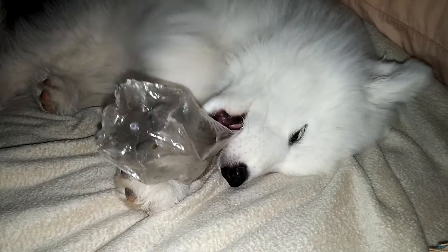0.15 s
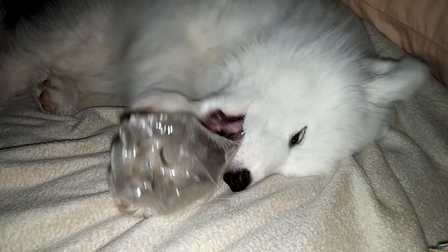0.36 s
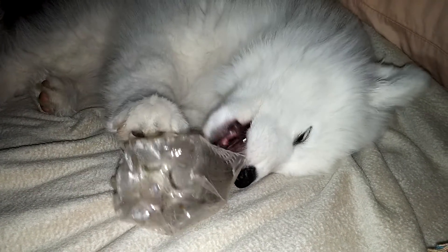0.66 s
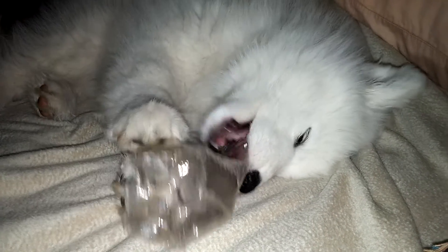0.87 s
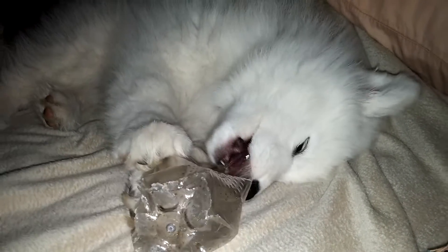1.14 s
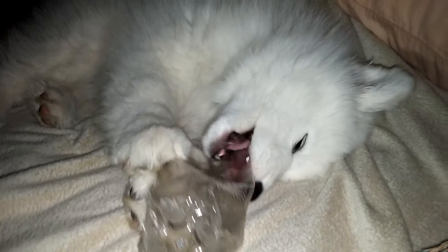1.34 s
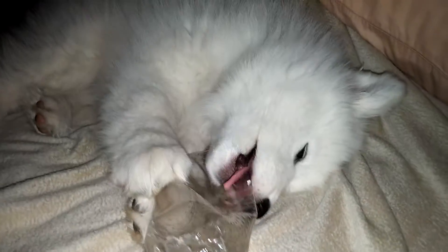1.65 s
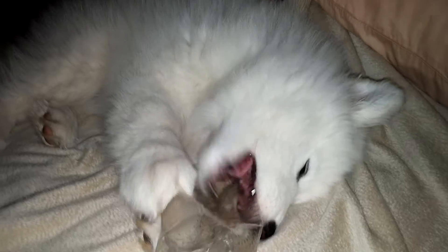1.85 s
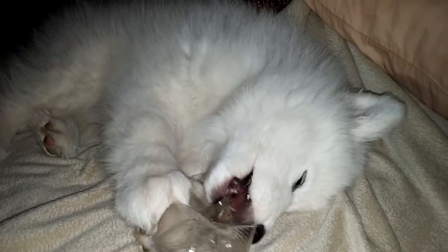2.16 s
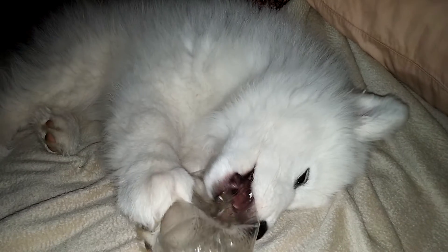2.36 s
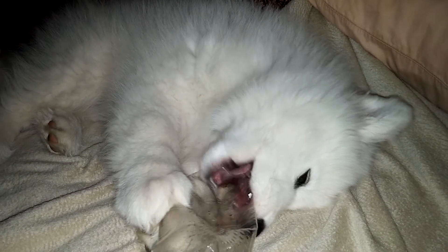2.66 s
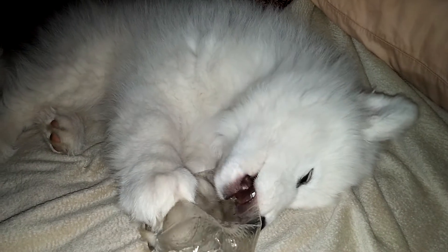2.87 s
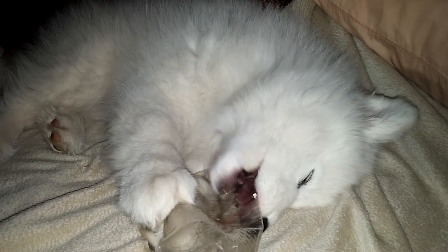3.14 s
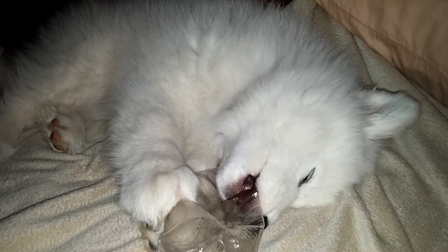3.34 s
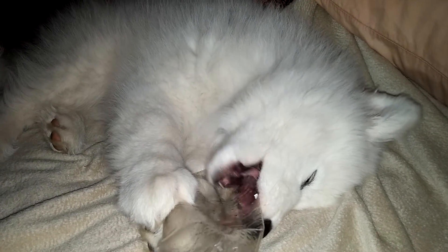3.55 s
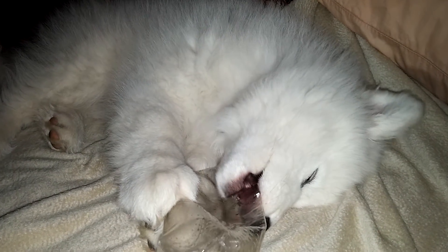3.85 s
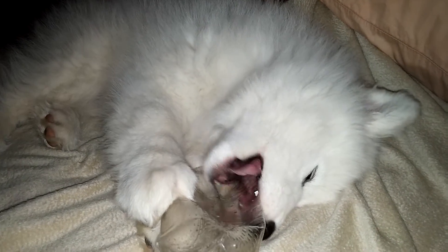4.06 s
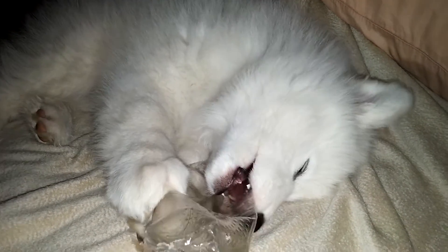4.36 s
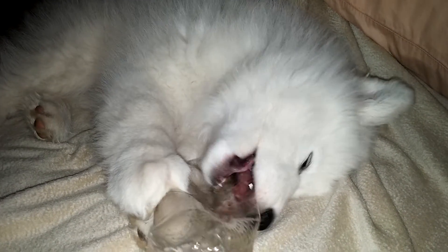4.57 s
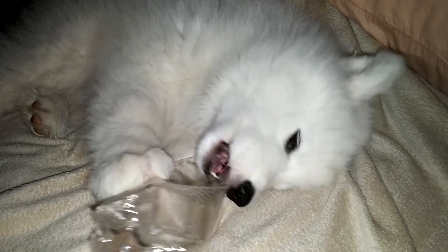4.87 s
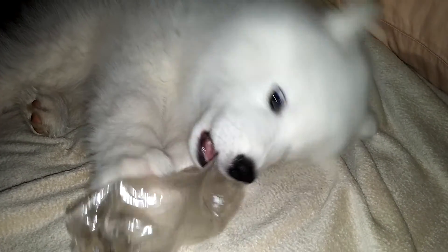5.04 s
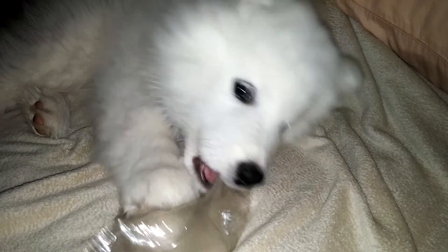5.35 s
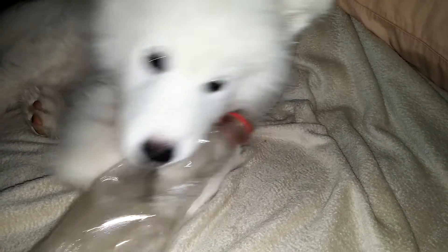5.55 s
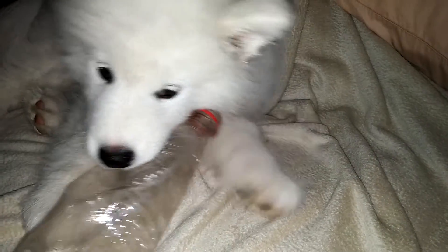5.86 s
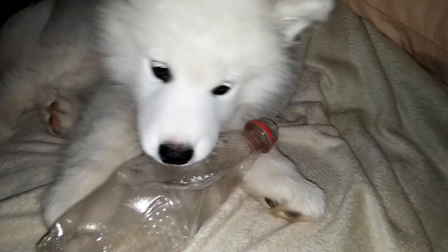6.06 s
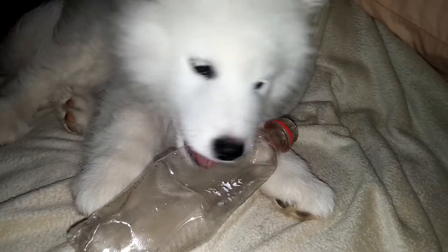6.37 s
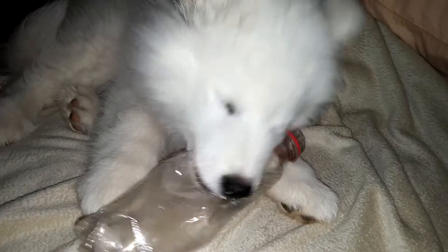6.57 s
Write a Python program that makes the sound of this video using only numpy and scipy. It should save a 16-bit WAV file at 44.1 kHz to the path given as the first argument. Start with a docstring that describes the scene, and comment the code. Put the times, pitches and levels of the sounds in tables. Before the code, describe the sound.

A close, dry stereo phone pickup in a quiet room with soft bedding. A puppy gnaws a thin empty plastic bottle. The first 0.45 seconds hold only a brief scrape, a tooth click and faint hush. From 0.5 to 0.8 crinkles and two clear hollow pocks arrive, then more clusters around 1.1-1.25 and 1.4-1.75. Each crease is a bright tick, short plastic rattle, hollow mid-pitched pop and soft low thump. At 2.2 and, loudest, 2.38 stiff panels snap with hard bright cracks and a brief rough ring. Sparser crackles follow from 2.6 to 3.9. Chewing thickens at 4.2-4.8, with a strong hollow pop at 4.45, and at 4.9-5.35, with a crunchy pop at 5.14. Busy crackling and fur rubbing fill 5.5-5.8; a lull, a pop at 6.15 and light final scraping near 6.4 end it.

```python
"""A thin empty plastic bottle crackles as a puppy gnaws it on a blanket, close to a phone in a quiet room.
Each crease that flips sums a tick, a wall rattle, a hollow panel pock and a soft thump, from noise and modes.
Twice a stiff panel snaps through: a hard crack, then dense clusters of partials ringing on.
Bouts of chewing scrape (random slips), set off small creases and brush fur on the plastic.
Bumps, tooth clicks, short reflections and a faint room hush complete the scene."""
import sys
import numpy as np
from scipy import signal
from scipy.fft import rfft, irfft, next_fast_len
from scipy.io import wavfile
from scipy.ndimage import uniform_filter1d

SR = 44100
rng = np.random.default_rng(int(sys.argv[2]) if len(sys.argv) > 2 else 0)


def log_audio(samples):
    """Write samples as a 16-bit WAV file to the path given in sys.argv[1]."""
    # one column per channel
    frames = np.atleast_2d(samples).T
    # limit to full scale, then quantise
    limited = np.clip(frames, -1, 1)
    pcm = np.round(limited * 32767).astype(np.int16)
    wavfile.write(sys.argv[1], SR, pcm)


N = 295911
TIME_S = np.arange(N) / SR
AGE_S = np.arange(SR // 4) / SR  # time since a hit
ONSET_SAMPLES = round(0.012 * SR)


def undb(db):
    """Convert decibels to an amplitude ratio."""
    return 10 ** (np.asarray(db) / 20)


def rms(x):
    """Root mean square over all samples and channels."""
    return np.sqrt(np.mean(x ** 2))


def level(x, db):
    """Set the rms level of a steady sound."""
    return x * undb(db) / rms(x)


def hit_level(x, db):
    """Set the rms level of the first 12 ms of a hit."""
    return x * undb(db) / rms(x[..., :ONSET_SAMPLES])


def add(out, time_s, x):
    """Mix x into both channels of out from time_s on."""
    start = max(int(time_s * SR), 0)
    out[:, start:start + x.shape[-1]] += x[..., :N - start]


def along(table, hz):
    """Interpolate (frequency, value) points on a log-frequency axis."""
    table_hz, value = np.transpose(table)
    return np.interp(np.log(hz + 1), np.log(table_hz), value)


def colour(x, table):
    """Minimum-phase filter with the given spectrum: causal, so attacks stay sharp."""
    length = x.shape[-1]
    size = next_fast_len(length // 2 + SR // 20) * 2
    hz = np.arange(size // 2 + 1) * SR / size
    cepstrum = irfft(np.log(undb(along(table, hz))))
    # fold the anticausal half onto the causal half
    cepstrum[1:size // 2] *= 2
    cepstrum[size // 2 + 1:] = 0
    response = np.exp(rfft(cepstrum))
    return irfft(rfft(x, size) * response)[..., :length]


def noise(length, apart):
    """White noise shared by both ports, plus a share that each hears alone."""
    return rng.standard_normal(length) + apart * rng.standard_normal((2, length))


def walk(rate_hz):
    """Slow random drift with an rms of 1: smoothed random steps."""
    step = int(SR / rate_hz)
    held = np.repeat(rng.standard_normal(N // step + 1), step)
    return level(uniform_filter1d(held, step)[:N], 0)


def decay(age_s, t60_s):
    """Exponential decay by 60 dB in t60_s."""
    return np.exp(-np.log(1000) * age_s / t60_s)


def rise(time_constant_s):
    """Exponential build-up of a hit."""
    return 1 - np.exp(-AGE_S / time_constant_s)


def mode(hz, t60_s, phase_rad=0):
    """One decaying resonance."""
    return np.sin(2 * np.pi * hz * AGE_S + phase_rad) * decay(AGE_S, t60_s)


def burst(table, t60_s, after_db, after_t60_s, apart):
    """A flurry of tiny slips as noise with a fast decay, over a weaker, slower shiver of the wall."""
    fade = decay(AGE_S, t60_s) + undb(after_db) * decay(AGE_S, after_t60_s)
    return colour(noise(len(AGE_S), apart) * fade * rise(0.00047), table)


# large creases flipping: (time [s], panel pitch [Hz], pock level [dB], wall rattle level [dB])
LARGE_CREASES = [(.4736, 825, -53.5, -63), (.633, 1008, -35, -40), (.724, 814, -32, -40),
                 (.7917, 710, -53, -58.5), (1.0667, 704, -49, -55.5), (1.1461, 876, -35.5, -40.5),
                 (1.2206, 881, -40.5, -52.5), (1.2303, 774, -40.5, -49), (1.4224, 885, -48.5, -66),
                 (1.624, 758.7, -47.5, -48), (1.6697, 865, -42.5, -54.5), (1.7009, 810, -41.5, -49.5),
                 (2.028, 700, -47.5, -50.5), (2.0733, 670, -48.5, -50.5), (2.0995, 1244, -44, -46.5),
                 (2.5848, 697, -40, -43.5), (2.6755, 660.3, -69, -43.5), (2.7923, 593, -39, -57),
                 (2.8038, 584, -40, -49.5), (2.8738, 868, -43.5, -49), (3.0585, 604, -53.5, -69),
                 (3.2955, 865, -41.5, -48), (3.3255, 836, -45.5, -53), (3.4662, 968, -54, -64),
                 (3.7769, 848.7, -42, -57), (4.295, 640, -48.5, -57.5), (4.3129, 855, -38.5, -50),
                 (4.3438, 836, -45, -53), (4.438, 720, -38.5, -47), (4.4517, 731, -25.5, -41),
                 (4.5743, 660, -55, -51), (4.7157, 690, -39, -47.5), (4.7451, 790, -45, -53.5),
                 (4.9356, 859, -36, -57), (5.043, 762, -36, -34.5), (5.1405, 797, -26.5, -26.5),
                 (5.2519, 900, -47.5, -52), (5.325, 644, -44, -61), (5.4867, 658, -55.5, -51.5),
                 (5.5023, 697, -43, -44.5), (5.5647, 1213, -41, -42), (5.6059, 658.5, -38, -37),
                 (5.6496, 765, -42.5, -49), (5.6722, 817, -39, -45), (5.767, 793, -38.5, -35.5),
                 (6.1548, 728, -33, -38), (6.4024, 800, -51, -52)]
# tick: level at a 0 dB rattle, growth with the rattle; thump: level at a 0 dB pock, growth with the pock
TICK_DB, TICK_GROWTH_DB_PER_DB = -21.5, 0.72
THUMP_DB, THUMP_GROWTH_DB_PER_DB = -36, 0.41
# a crease starts to give before it flips: longest lead, level relative to the flip
GIVE_MAX_LEAD_S, GIVE_DB = 0.0023, -22


def creases(flips):
    """Each flipping crease ticks, rattles the wall, rings the panel and thumps the bottle."""
    out = np.zeros((2, N))
    for time_s, hz, panel_db, wall_db in flips:
        pock = hit_level(panel(hz, t60_s=0.026, rise_s=0.001, others_db=-2.5), panel_db)
        rattle = hit_level(wall(), wall_db)
        contact = tick(TICK_DB + TICK_GROWTH_DB_PER_DB * wall_db)
        jolt = thump(THUMP_DB + THUMP_GROWTH_DB_PER_DB * panel_db)
        add(out, time_s, pock + rattle + contact + jolt)

        give = contact + hit_level(wall(), wall_db)
        add(out, time_s - GIVE_MAX_LEAD_S * rng.random(), undb(GIVE_DB) * give)
    return out


# spectrum of the bent panel: (frequency [Hz], level per Hz [dB])
PANEL_COLOUR = [(70, -41.5), (250, -27), (480, -16), (650, -2), (850, -4.5), (1100, -9.5), (1400, -13),
                (2500, -36.5), (5000, -64)]


def panel(hz, t60_s, rise_s, others_db):
    """Hollow pock: the main mode of the bent panel among its quickly damped neighbours."""
    main = mode(hz, t60_s) * rise(rise_s)
    others = burst(PANEL_COLOUR, t60_s=0.016, after_db=-19, after_t60_s=0.09, apart=0.12)
    return hit_level(main, 0) + hit_level(others, others_db)


# spectrum of the wall rattle: (frequency [Hz], level per Hz [dB])
WALL_COLOUR = [(120, -50.5), (600, -29.5), (1300, -4), (1900, -1.5), (2550, 3), (3400, -7.5), (5000, -15),
               (7000, -24.5), (14000, -48)]
# low wall resonances shaken by every crease: (frequency [Hz])
LOW_WALL_MODES_HZ = [1166, 1466, 1760, 1968, 2425, 2480]


def wall():
    """The wall rattles; each hit excites the low resonances at random strengths and slightly bent pitches."""
    rattle = burst(WALL_COLOUR, t60_s=0.01, after_db=-17, after_t60_s=0.06, apart=0.55)
    ring = 0
    for hz in LOW_WALL_MODES_HZ:
        size, bend = rng.standard_normal(2)
        ring = ring + size * mode(hz * (1 + 0.04 * bend), t60_s=0.036)
    return hit_level(rattle, 0) + hit_level(ring, -1)


# spectrum of a contact: (frequency [Hz], level per Hz [dB])
TICK_COLOUR = [(200, -40), (1500, -18.5), (4000, -0.5), (6300, 2), (7600, -8), (9600, 0), (12000, -8.5),
               (15500, -13.5)]


def tick(db):
    """Bright, very short noise burst of the contact itself."""
    contact = burst(TICK_COLOUR, t60_s=0.006, after_db=-19, after_t60_s=0.065, apart=0.8)
    return hit_level(contact, db)


# spectrum of the jolted bottle: (frequency [Hz], level per Hz [dB])
THUMP_COLOUR = [(40, -29), (100, -8), (200, -6.5), (285, 2.5), (400, -4.5), (600, -14), (1200, -63)]
# boom of the whole bottle: mean pitch, relative pitch spread, level relative to the jolt
BOOM_HZ, BOOM_SPREAD_RATIO, BOOM_DB = 300, 0.16, -4


def thump(db):
    """The whole bottle is jolted and booms softly; the boom's pitch varies at random from thump to thump."""
    boom_hz = BOOM_HZ * (1 + BOOM_SPREAD_RATIO * rng.standard_normal())
    boom = mode(boom_hz, t60_s=0.05) * rise(0.0015)
    jolt = burst(THUMP_COLOUR, t60_s=0.03, after_db=-13, after_t60_s=0.073, apart=0.1)
    return hit_level(hit_level(jolt, 0) + hit_level(boom, BOOM_DB), db)


# stiff panels snapping through:
# (time [s], lowest ringing pitch [Hz], ring level [dB], crack level [dB], panel level [dB], tick level [dB])
PANEL_SNAPS = [(2.2068, 2783, -27.5, -20, -35.5, -44.5), (2.383, 1958, -25, -12.5, -32.5, -29.5)]
# ringing of the snapped wall: (frequency [Hz], relative level [dB], t60 [s])
SNAP_MODES = [(1870, -8.5, 0.098), (2130, 3.5, 0.046), (2300, -11, .11), (2325, -1.5, 0.079),
              (2590, 4.5, 0.066), (3144, -20, .1), (3482, -7, .13), (3720, -6.5, 0.18), (3580, 2, 0.11),
              (4200, -5, 0.068), (4250, -1.5, 0.12), (4460, -3.5, 0.13), (4920, 3, 0.084), (5250, -13, .11),
              (5980, -13.5, 0.063)]
# spectrum of the crack: (frequency [Hz], level per Hz [dB])
CRACK_COLOUR = [(500, -33), (1300, -7), (2050, 2.5), (2800, 1.5), (3500, -3), (4500, -1), (5500, -12),
                (6500, -13), (7600, -28.5), (15000, -43.5)]


def snap_ring(low_hz):
    """Wall modes above low_hz ring roughly, each a dense cluster of randomly spaced partials."""
    ring = 0
    for hz, db, t60_s in SNAP_MODES:
        partials_hz = hz * (1 + 0.022 * rng.standard_normal(size=9))
        cluster = sum(mode(f, t60_s, rng.uniform(0, 2 * np.pi)) for f in partials_hz)
        ring = ring + undb(db) * cluster / (1 + (low_hz / hz) ** 8)
    return ring * rise(0.00086)  # short, soft onset


def snaps():
    """A taut panel pops inside out: a hard crack, a pock and a tick, then the wall rings on."""
    out = np.zeros((2, N))
    for time_s, low_hz, ring_db, crack_db, panel_db, tick_db in PANEL_SNAPS:
        ring = snap_ring(low_hz)
        crack = burst(CRACK_COLOUR, t60_s=0.012, after_db=-21, after_t60_s=0.13, apart=0.45)
        highpass = signal.butter(5, 0.69 * low_hz, "highpass", fs=SR, output="sos")
        crack = signal.sosfilt(highpass, crack)
        pock = panel(720, t60_s=0.025, rise_s=0.0005, others_db=5)
        contact = burst(TICK_COLOUR, t60_s=0.0037, after_db=-23.5, after_t60_s=0.08, apart=0.33)
        hit = hit_level(ring, ring_db) + hit_level(crack, crack_db)
        hit = hit + hit_level(pock, panel_db) + hit_level(contact, tick_db)
        add(out, time_s, hit)
    return out


# bouts of chewing: (start [s], end [s], pressure level [dB], brushing fur level [dB])
CHEWING_BOUTS = [(0, .025, -55, -83), (0.466, 0.769, -57, -63.5), (1.138, 1.241, -56, -69),
                 (1.556, 1.785, -56, -66.5), (1.979, 2.48, -62, -65), (2.766, 2.924, -58, -71),
                 (3.225, 3.35, -58, -71.5), (3.686, 3.861, -55, -73), (4.177, 4.48, -60.5, -72),
                 (4.58, 4.799, -57, -71), (4.887, 5.334, -61.5, -65.5), (5.523, 5.78, -53, -59.5),
                 (6.14, 6.213, -53, -58.5), (6.324, 6.497, -63.5, -67)]
# the jaw closes quickly and lets go more slowly; a faint steady rustle remains between bouts
GRIP_ATTACK_S, GRIP_RELEASE_S, REST_PRESSURE_DB, REST_FUR_DB = 0.02, 0.034, -70.5, -76.5


def grip(column, rest_db):
    """Gain of one chewing level over time: attack, hold and release over a resting level."""
    gain = np.full(N, undb(rest_db))
    for start_s, end_s, *levels_db in CHEWING_BOUTS:
        attack = np.clip((TIME_S - start_s) / GRIP_ATTACK_S + 0.5, 0, 1)
        release = np.exp(-np.maximum(TIME_S - end_s, 0) / GRIP_RELEASE_S)
        gain = np.hypot(gain, attack * release * undb(levels_db[column]))
    return gain


SMALL_CREASES_PER_S, SMALL_PITCH_HZ, SMALL_PITCH_SPREAD_OCTAVES = 6, 764, 0.27
# random spread; pock and rattle relative to the jaw pressure
SMALL_SPREAD_DB, SMALL_PANEL_DB, SMALL_WALL_DB = 2, 4.5, -2


def small_creases(pressure):
    """Minor creases give way at random: the harder the jaw presses, the more often and the louder."""
    chance = rng.random(int(SMALL_CREASES_PER_S * N / SR))
    moments = np.searchsorted(np.cumsum(pressure), chance * pressure.sum())
    flips = []
    for at in moments:
        force, size = rng.standard_normal(2)
        db = 20 * np.log10(pressure[at]) + SMALL_SPREAD_DB * force
        hz = SMALL_PITCH_HZ * 2 ** (SMALL_PITCH_SPREAD_OCTAVES * size)
        flips.append((at / SR, hz, db + SMALL_PANEL_DB, db + SMALL_WALL_DB))
    return flips


def slips(rate_hz, spread_db):
    """Stick and slip: tiny random jolts of either sign, most weak and a few strong."""
    size = undb(spread_db * np.minimum(rng.exponential(size=N), 3.5))
    happens = rng.random(N) < rate_hz / SR
    return happens * size * rng.choice([-1, 1], N)


# spectrum of brushing fur: (frequency [Hz], level per Hz [dB])
FUR_COLOUR = [(400, -10), (1200, 12.5), (2200, 8.5), (4000, 5), (7500, -2.5), (9700, 0), (12000, -3),
              (15500, -7.5)]


def handling(pressure, brushing):
    """Teeth and paws scrape the same panels and wall by stick-slip; fur brushes over the plastic."""
    jolts = slips(rate_hz=520, spread_db=5) * undb(2 * walk(70))
    scrape = level(colour(jolts, PANEL_COLOUR), 0.27)
    scrape = scrape + level(colour(jolts, WALL_COLOUR), -7.5)
    scrape = scrape + level(colour(jolts, THUMP_COLOUR), -8)
    scrape = scrape + level(colour(slips(rate_hz=150, spread_db=7.5), TICK_COLOUR), -18)

    hairs = np.array([slips(rate_hz=4000, spread_db=4.5) for _ in range(3)]) * undb(1.5 * walk(60))
    shared, own = hairs[0], hairs[1:]
    fur = level(colour(shared + own, FUR_COLOUR), 3.5)
    return scrape * pressure + fur * brushing


# jaw or paw knocking the whole bottle: (time [s], level [dB])
BOTTLE_BUMPS = [(.53, -53), (.726, -44.5), (1.0675, -49.5), (1.23, -45.5), (1.701, -50), (2.074, -46.5),
                (2.425, -47.5), (2.803, -50.5), (4.611, -45.5), (5.652, -49.5), (6.156, -48)]


def bumps():
    """Jaw and paws knock softly against the bottle, which thumps."""
    out = np.zeros((2, N))
    for time_s, db in BOTTLE_BUMPS:
        add(out, time_s, thump(db))
    return out


# teeth slipping without flipping a panel: (time [s], level [dB])
TOOTH_SLIPS = [(0.0856, -42), (0.3004, -54.5), (0.8774, -54), (1.7313, -52.5), (2.1971, -50.5),
               (5.738, -46), (6.192, -46)]


def tooth_clicks():
    """A slipping tooth gives a bright click and a weaker wall rattle."""
    out = np.zeros((2, N))
    for time_s, db in TOOTH_SLIPS:
        add(out, time_s, tick(db) + hit_level(wall(), db - 6.5))
    return out


# reflections off nearby surfaces: (delay [s], level [dB])
NEAR_ECHOES = [(.0064, -18), (0.0115, -14.5)]


def echoes(x):
    """Hard surfaces nearby return the upper range a few milliseconds later."""
    bandpass = signal.butter(1, [1500, 6500], "bandpass", fs=SR, output="sos")
    upper = signal.sosfilt(bandpass, x)
    out = x
    for delay_s, db in NEAR_ECHOES:
        delayed = np.pad(upper, ((0, 0), (int(delay_s * SR), 0)))[:, :N]
        out = out + undb(db) * delayed
    return out


# microphone port level difference: (frequency [Hz], left minus right [dB])
PORT_BALANCE_DB = [(100, 2.5), (700, 1.5), (1300, -0.5), (2500, -2), (4400, 1), (7000, 2), (9500, -5),
                   (12500, 6), (15000, 6)]
# microphone port phase difference: (frequency [Hz], lead of the left [rad])
PORT_LEAD_RAD = [(100, 0.065), (850, 0.079), (1500, 1), (2400, 1.3), (3400, 1.79), (6000, 1.98), (9500, 2),
                 (14000, 1.5)]
PORT_RING_HZ, PORT_RING_WIDTH_HZ, PORT_RING_GAIN = 9630, 1400, 1.1  # gain is linear, added to 1


def ports(x):
    """Two ports differ in shading and phase; the right one has a narrow treble resonance."""
    size = next_fast_len(N + SR // 10) * 2
    hz = np.arange(size // 2 + 1) * SR / size
    # each port takes half of the difference
    half = undb(along(PORT_BALANCE_DB, hz) / 2) * np.exp(0.5j * along(PORT_LEAD_RAD, hz))
    cavity = 1 + PORT_RING_GAIN / (1 + 2j * (hz - PORT_RING_HZ) / PORT_RING_WIDTH_HZ)
    return irfft(rfft(x, size) * np.array([half, cavity / half]))[:, :N]


def room(x, wet_db, t60_s, treble_hz, gap_s):
    """Short, soft reflections from bedding and walls: decaying noise, different at each port."""
    age_s = np.arange(SR // 2) / SR
    fade_in = np.clip(age_s / gap_s - 1, 0, 1)
    tail = rng.standard_normal((2, len(age_s))) * decay(age_s, t60_s) * fade_in
    tail = tail / np.sqrt(np.mean(np.sum(tail ** 2, axis=1)))  # unit mean energy
    tail = signal.sosfilt(signal.butter(2, treble_hz, fs=SR, output="sos"), tail)
    return undb(wet_db) * signal.fftconvolve(x[None], tail, axes=1)[:, :N]


# spectrum of the room hush: (frequency [Hz], level per Hz [dB])
ROOM_AIR_COLOUR = [(25, 6.5), (60, 5), (120, -1), (280, 0), (600, -3), (1400, -4), (2500, -10), (5000, -12),
                   (10000, -23.5), (15500, -23.5)]
ROOM_MID_DB, ROOM_SIDE_DB = -66.5, -68.5


def room_air():
    """Faint slowly drifting room hush: coloured noise, mostly shared by both ports."""
    mid = level(colour(rng.standard_normal(N), ROOM_AIR_COLOUR), ROOM_MID_DB)
    side = level(colour(rng.standard_normal(N), ROOM_AIR_COLOUR), ROOM_SIDE_DB)
    drift = undb(0.8 * walk(2))
    return (mid + side * np.array([[1], [-1]])) * drift


def scene():
    """Sum the bottle sounds, pass them to ports and room, and add the room hush."""
    pressure = grip(0, REST_PRESSURE_DB)
    brushing = grip(1, REST_FUR_DB)
    flips = LARGE_CREASES + small_creases(pressure)
    bottle = creases(flips) + snaps() + handling(pressure, brushing) + bumps() + tooth_clicks()
    bottle = echoes(bottle)
    reflections = room(bottle.mean(axis=0), wet_db=-12.5, t60_s=0.2, treble_hz=5930, gap_s=0.0013)
    return ports(bottle) + reflections + room_air()


def record(dry):
    """The phone clips at full scale, thins the deep bass and cuts the top."""
    clipped = np.clip(dry, -1, 1)
    thin = signal.sosfilt(signal.butter(2, 85, "highpass", fs=SR, output="sos"), clipped)
    return signal.sosfilt(signal.ellip(10, 0.2, 80, 16000, fs=SR, output="sos"), thin)


dry = scene()
out = record(dry)
log_audio(out)
```